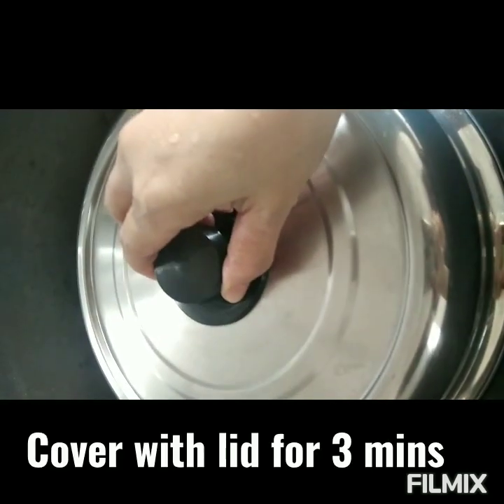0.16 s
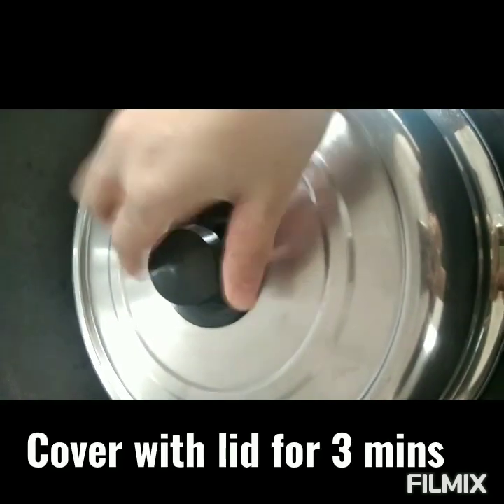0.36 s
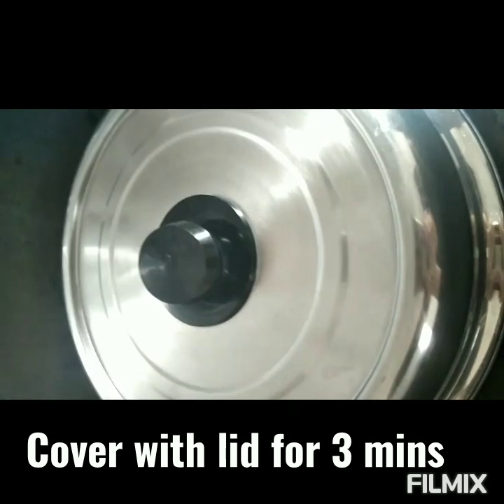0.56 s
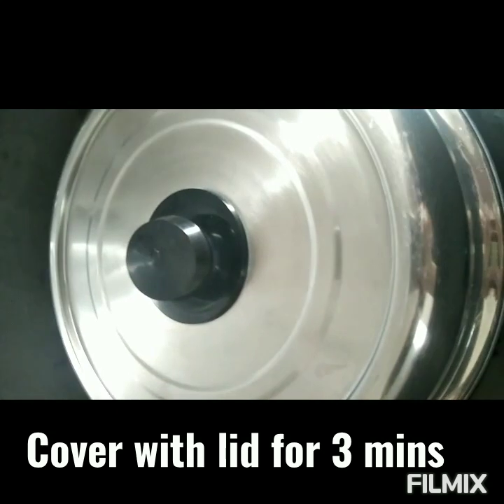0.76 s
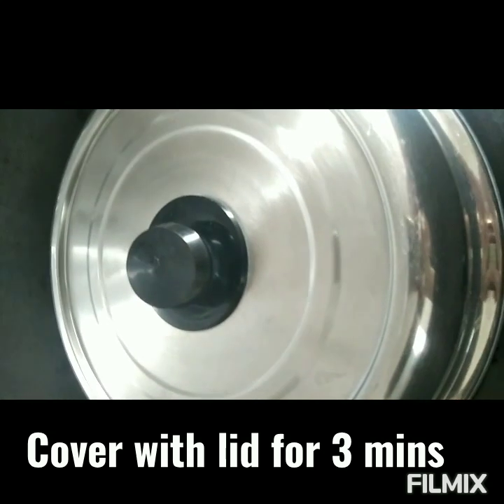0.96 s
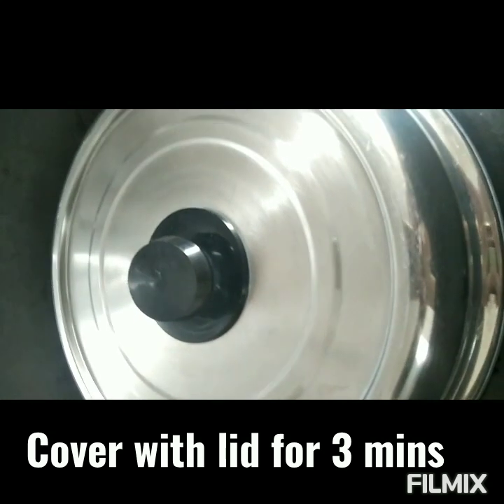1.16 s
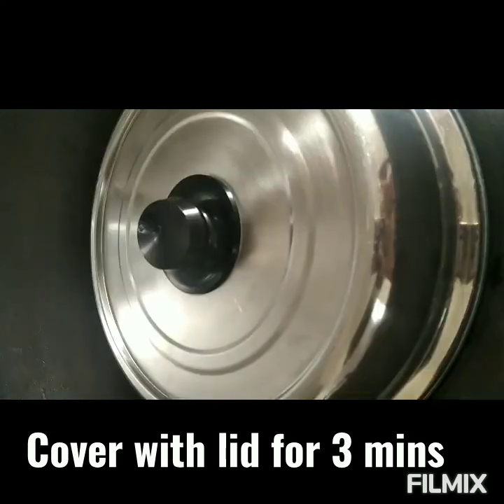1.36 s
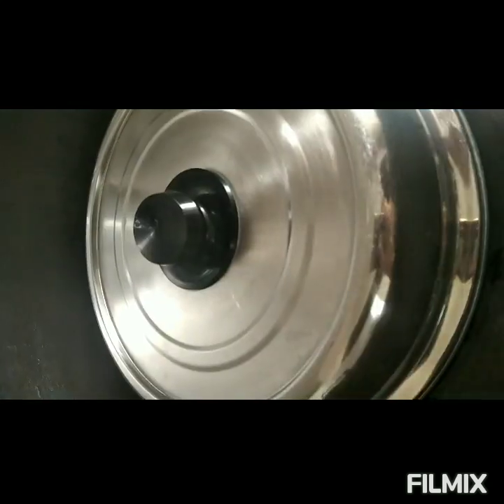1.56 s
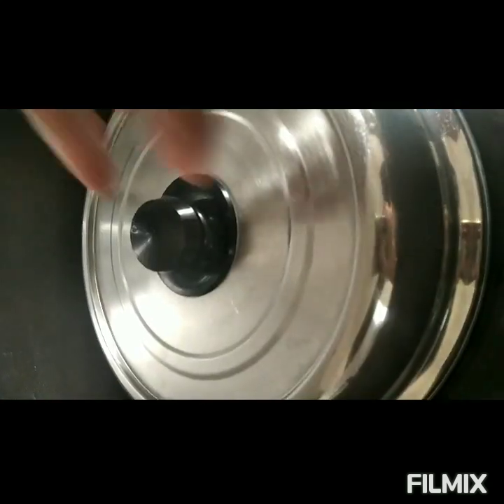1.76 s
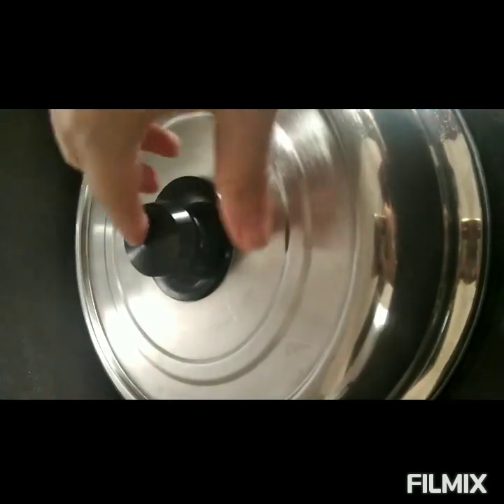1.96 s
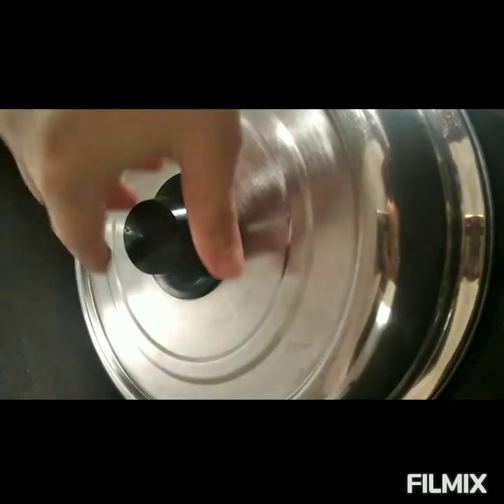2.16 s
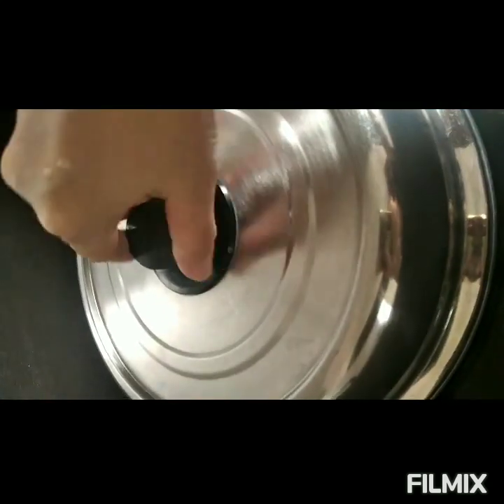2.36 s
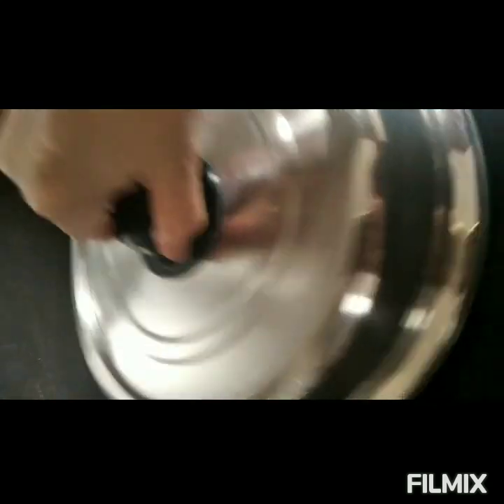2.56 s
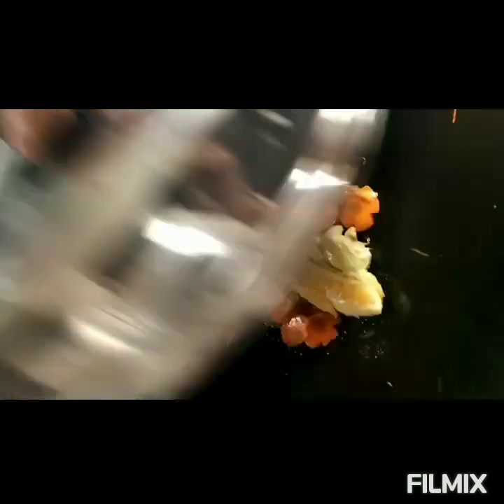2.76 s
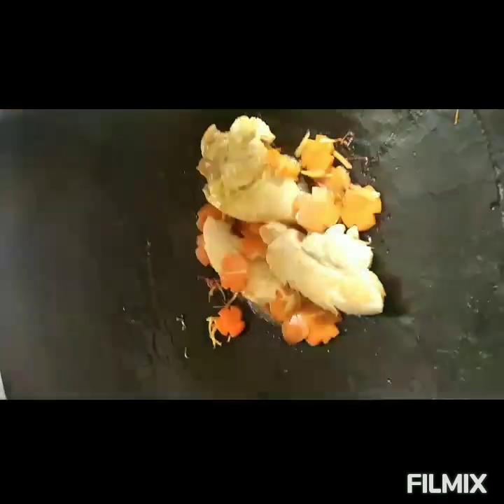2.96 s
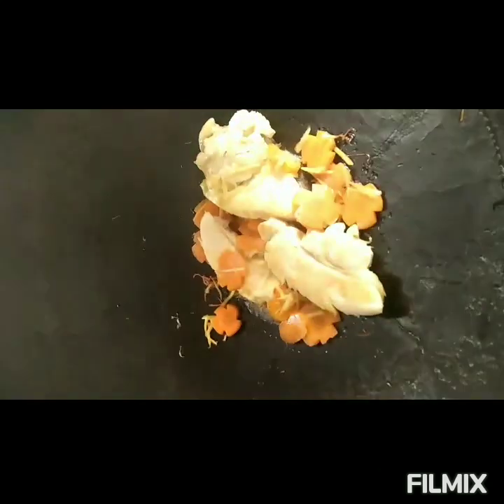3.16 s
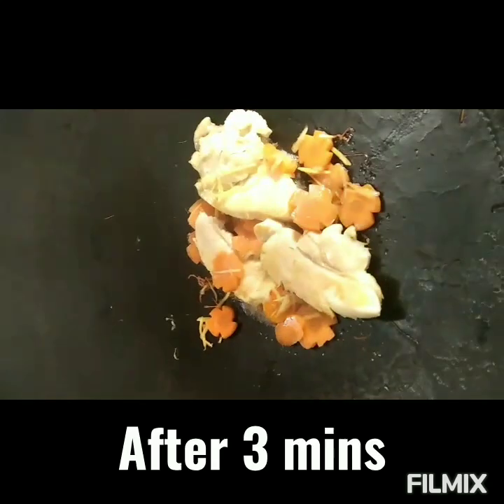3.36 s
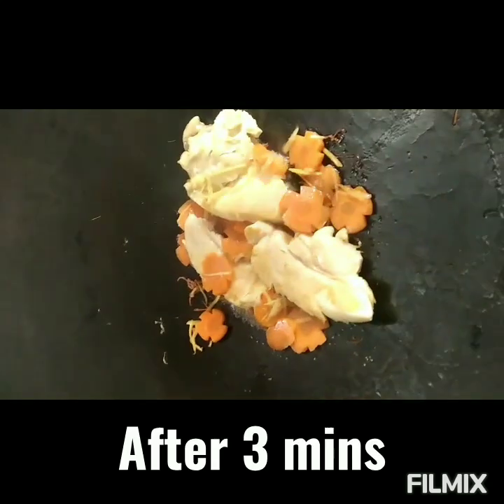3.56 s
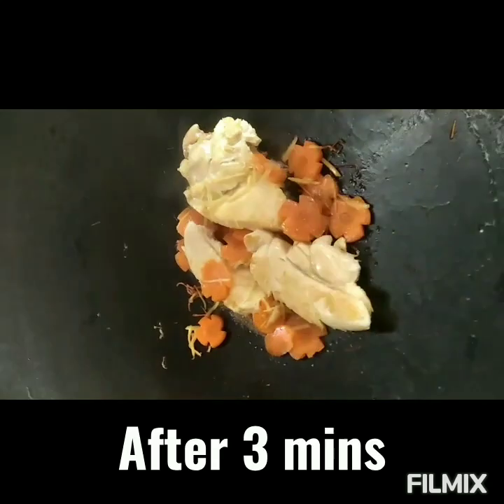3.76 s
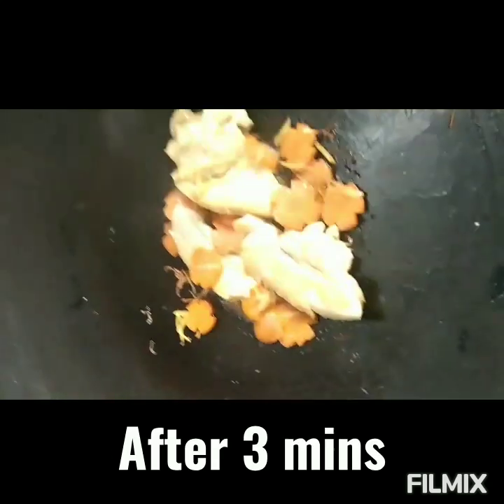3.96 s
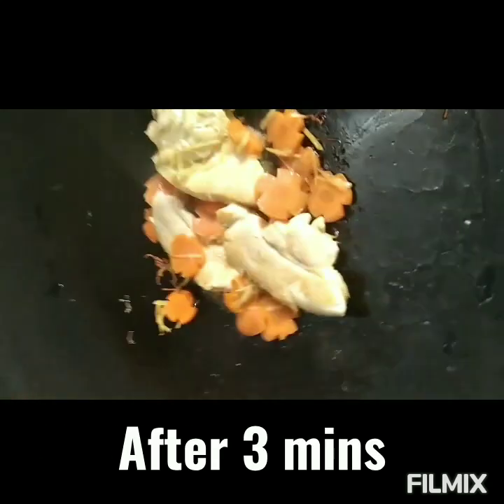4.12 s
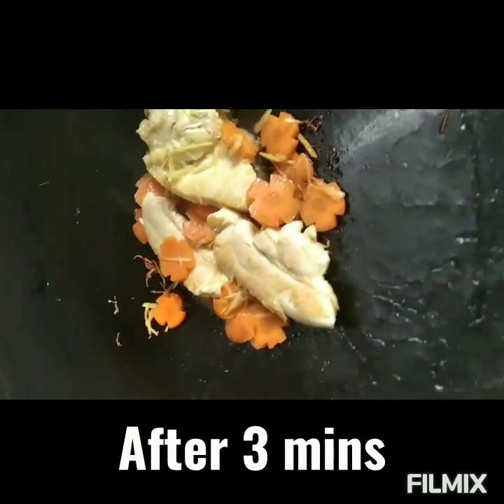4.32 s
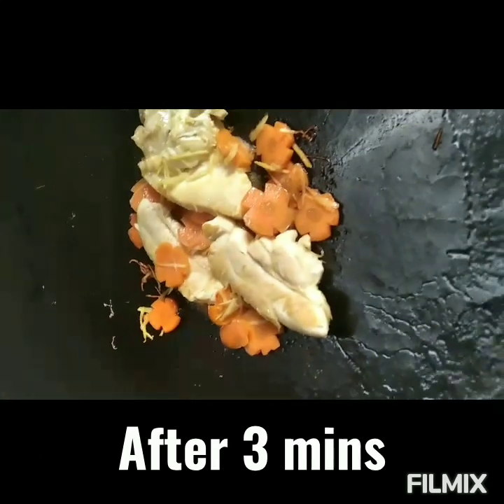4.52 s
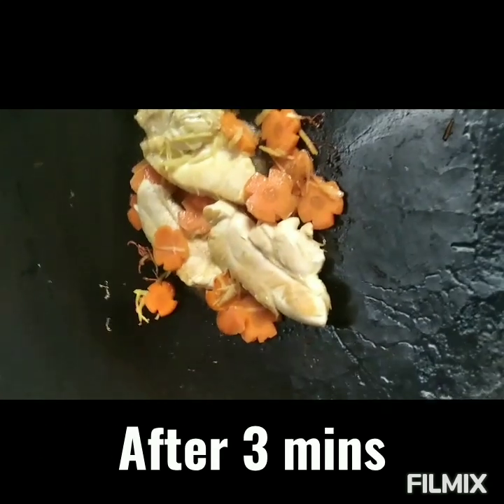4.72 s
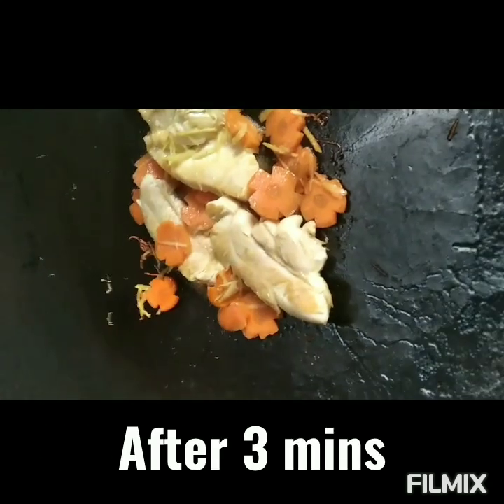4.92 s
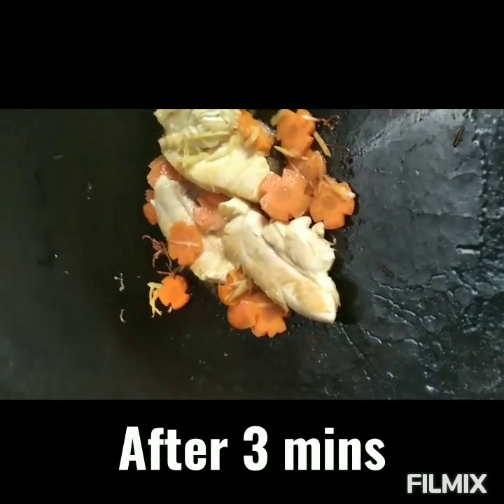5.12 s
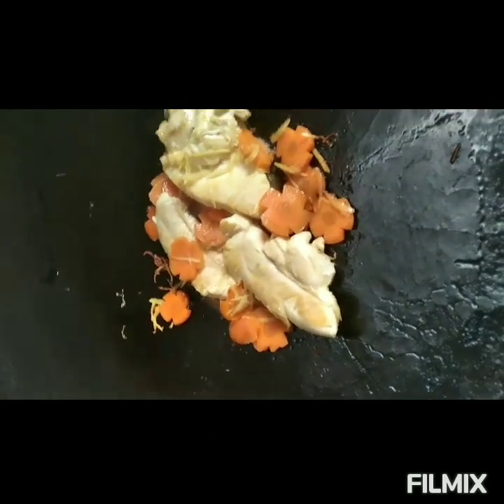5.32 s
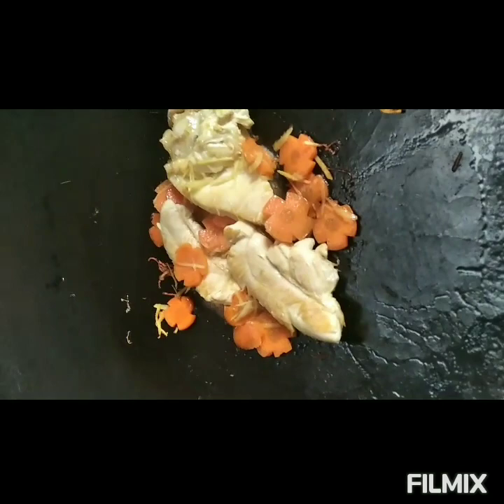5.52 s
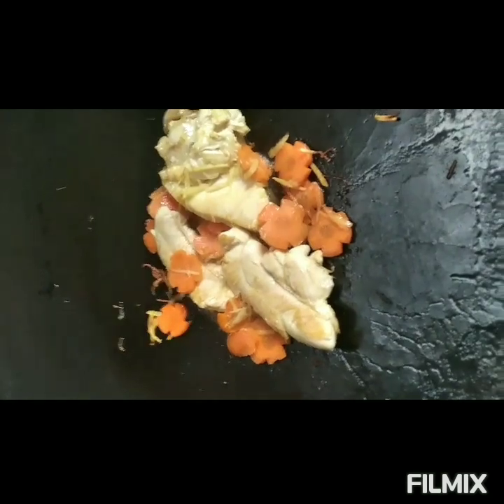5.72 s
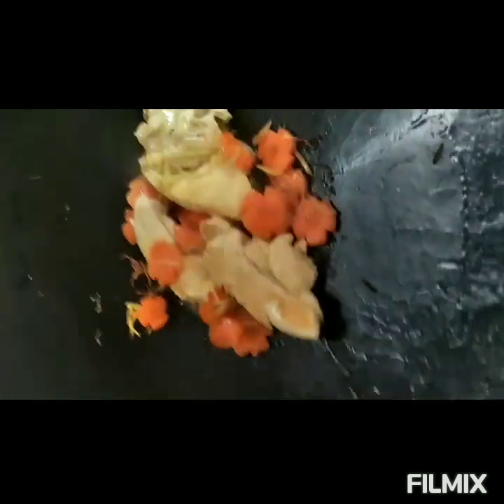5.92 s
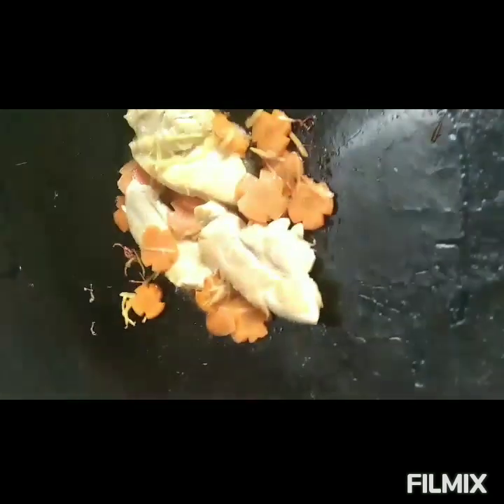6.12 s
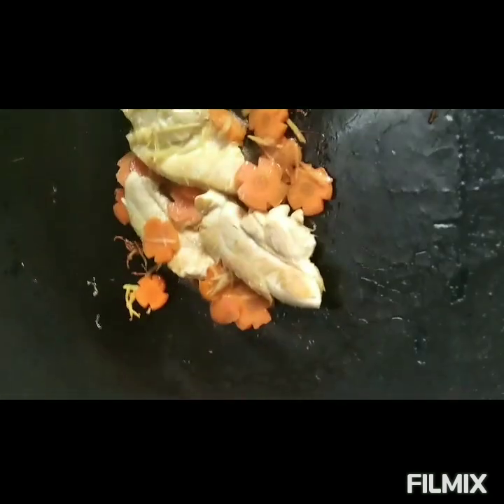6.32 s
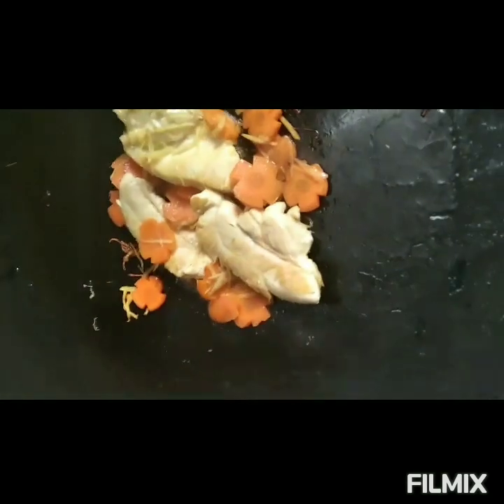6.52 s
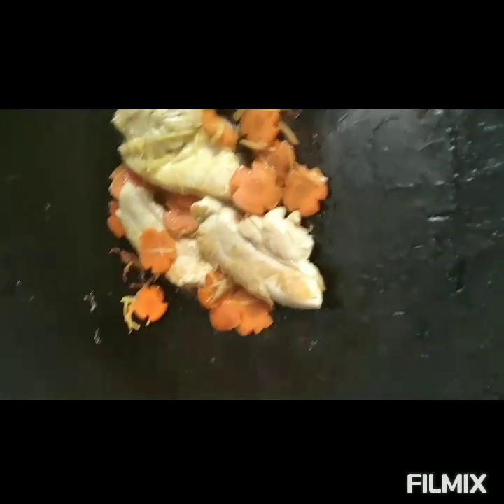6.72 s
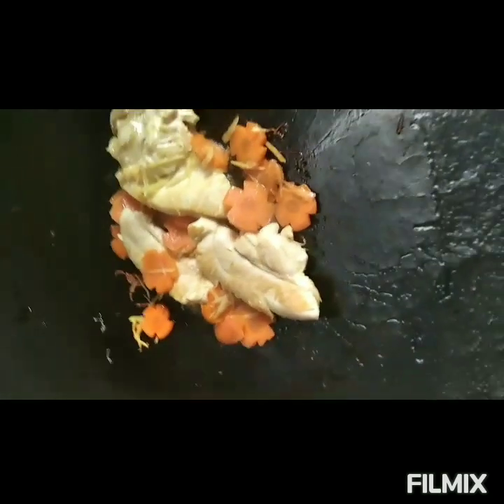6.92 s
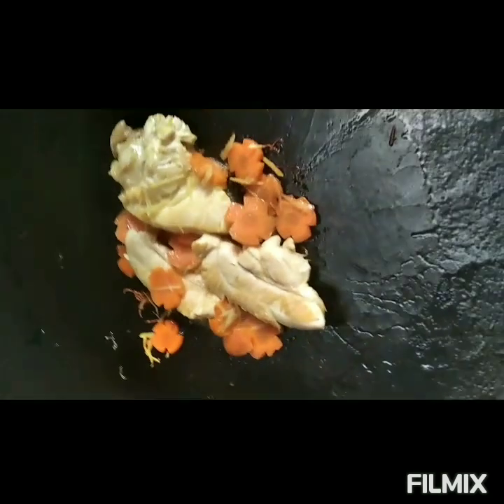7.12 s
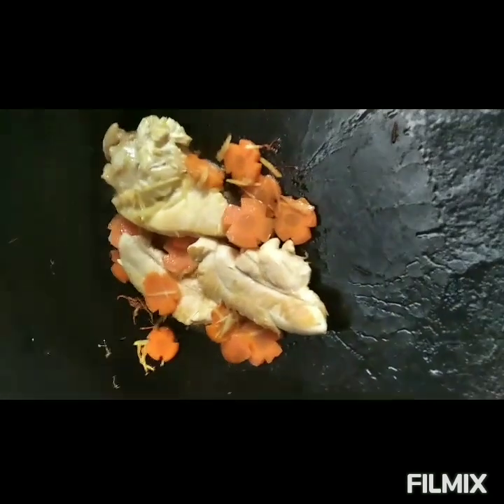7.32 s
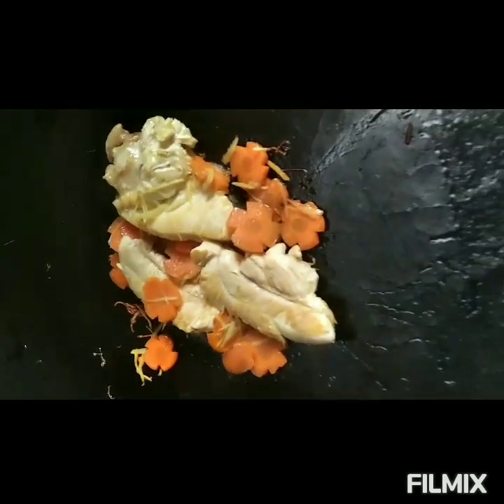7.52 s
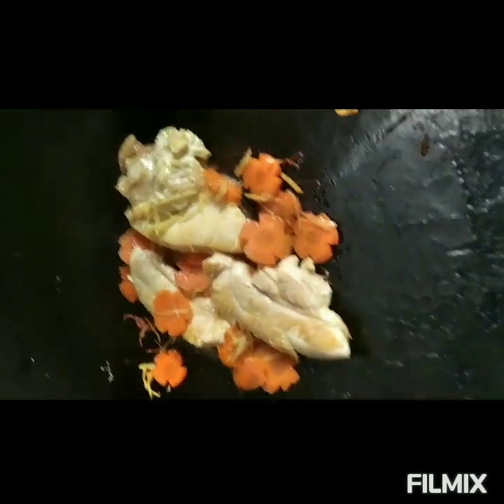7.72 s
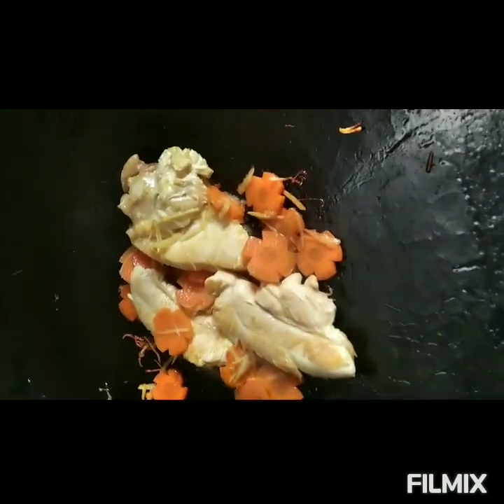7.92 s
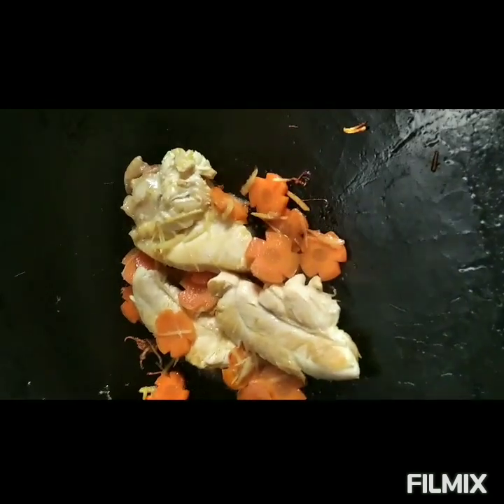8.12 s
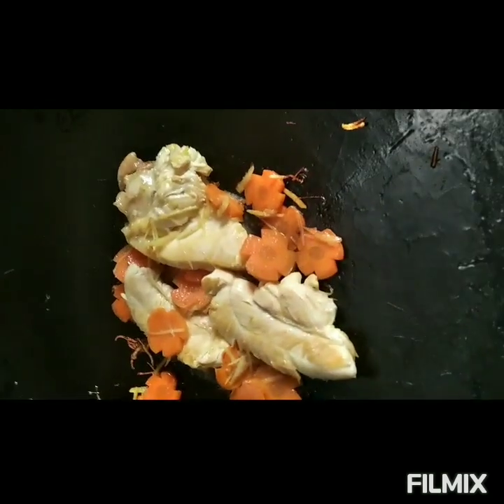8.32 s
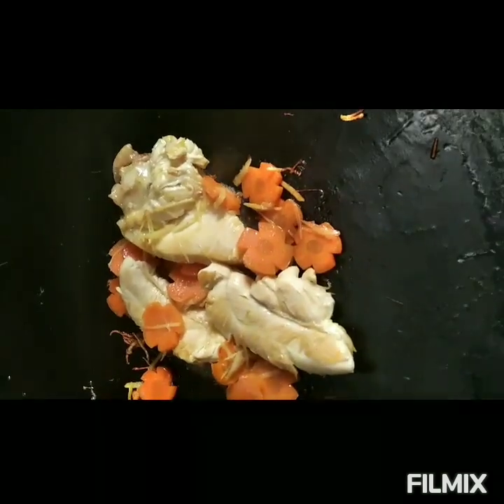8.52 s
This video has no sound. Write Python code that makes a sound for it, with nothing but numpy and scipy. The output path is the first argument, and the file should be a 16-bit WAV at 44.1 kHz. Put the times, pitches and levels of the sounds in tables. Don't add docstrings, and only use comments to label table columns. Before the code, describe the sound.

Close stereo pickup of a wok in a home kitchen: muffled, resonant sizzling under a metal lid, with a dull knock near the start, then a drier, quieter stage. The lid comes off with clicks and spitting steam, and the frying turns open and crisp. After a long even sizzle and tiny creaks, the lid crashes onto the counter, bounces, rings and rolls still. A low fan hum runs underneath.

```python
import sys
import numpy as np
from scipy import signal
from scipy.fft import rfft, irfft, next_fast_len
from scipy.io import wavfile
from scipy.ndimage import uniform_filter1d, map_coordinates

SR = 44100
rng = np.random.default_rng(int(sys.argv[2]) if len(sys.argv) > 2 else 0)


def ratio(d):
    e = np.asarray(d, float) / 20
    return 10 ** e


def put_to_file(sound):
    columns = np.atleast_2d(sound).T
    safe = np.clip(columns, -1, 1)
    whole_steps = np.round(safe * 32767)
    wavfile.write(sys.argv[1], SR, whole_steps.astype(np.int16))


N = 377937
LIFT_S = 2.545

# f/Hz, width/Hz, landing level/dB, rocking level/dB
BODY_MODES = [(270, 18.5, -12.5, -11), (349.5, 18.3, -8.5, -7.5), (382, 11, -3.5, -8), (461, 9, -4.5, 0.5),
              (503.4, 9.7, -2, 2), (576, 12.5, 1, -5), (630, 13, -4, -11), (681, 14, -7, -5.5),
              (770, 23, -20, -7), (886, 19, -13, -10.5)]
# f/Hz, level/dB, t60/s
RIM_MODES = [(2834, -3.5, 0.25), (2894, -1, 0.24), (3240, -10, 1.2), (3420, -34, 5.0), (3590, -8, 0.6),
             (4190, -11, 5.0), (4560, -21, 0.32), (4560, -20, 0.99), (4780, -8.5, 1.0)]


def unit(x):
    return x / np.sqrt(np.mean(x ** 2) + 1e-20)


def along(points, hz):
    f, v = np.transpose(points)
    return np.interp(np.log(hz + 1), np.log(f + 1), v)


def wobble(rate):
    knots = rng.standard_normal(int(N * rate / SR) + 4)
    return map_coordinates(knots, [np.arange(N) * rate / SR])


def filtered(x, response):
    m = next_fast_len(x.shape[-1] + SR // 4)
    spectrum = rfft(x, m) * response(np.fft.rfftfreq(m, 1 / SR))
    return irfft(spectrum, m)[..., :x.shape[-1]]


def band(lo_hz, hi_hz):
    return lambda f: 1 / ((1 + lo_hz / (1j * f + 1e-9)) * (1 + 1j * f / hi_hz)) ** 2


def modes(peaks):
    def response(f):
        total = 0
        for k, (centre, width, db) in enumerate(peaks):
            damping = 1j * f * width
            total = total + (-1) ** k * ratio(db) * damping / (centre * centre - f * f + damping)
        return total
    return response


def ring(table, t, stretch):
    tones = 0
    for hz, db, t60 in table:
        decay_db = -60 * t / (stretch * min(t60, .45))
        tones = tones + ratio(db + rng.normal(0, 3.6) + decay_db) * np.sin(2 * np.pi * hz * t)
    return tones * (1 - np.exp(-t / 0.0016))


def swell(s, rise, t60, stop=np.inf):
    t = np.arange(N) / SR - s
    let_go_s = 0.033
    release = np.clip((stop - s - t) / let_go_s + 1, 0, 1)
    return np.clip(t / rise, 0, 1) * ratio(-60 * np.clip(t - rise, 0, None) / t60) * release


def heat():
    t = np.arange(N) / SR
    later_s, opening_s = 1.333, 0.059
    # t/s, rise/s, level/dB, t60/s
    gusts = [
        (2.56, 0.079, -35, 0.34),
        (2.84, 0.03, -39, 0.39),
    ]
    opened = np.clip((t - LIFT_S) / opening_s, 0, 1)
    early = ratio(-42 + 6 * np.exp(-t / 0.09)) * (t < later_s)
    late = ratio(-47.5) * (t >= later_s) * (1 - opened)
    bare = ratio(-36 + 4.5 * np.exp(-abs(t - LIFT_S) / 0.38)) * opened
    steam = sum(ratio(db) * swell(s, rise, t60) for s, rise, db, t60 in gusts)
    return early, late, bare, steam


def crackle():
    pops_per_s, pop_t60 = 900, 0.0051
    pops = (rng.random((2, N)) < pops_per_s / SR) * ratio(2.1 * rng.exponential(size=(2, N)))
    decay = ratio(-60 * np.arange(400) / SR / pop_t60)
    puff = signal.fftconvolve(pops, decay[None], axes=1)[:, :N]
    hiss = rng.standard_normal((2, N)) * (1 + 0.19 * unit(puff))
    z = signal.stft(hiss, nperseg=512)[2]
    field = rng.standard_normal(z.shape[1:])
    field = uniform_filter1d(uniform_filter1d(field, 8, 0), 10, 1)
    uneven = signal.istft(z * ratio(1.06 * unit(field)), nperseg=512)[1][:, :N]
    return uneven * ratio(0.45 * wobble(7))


def sizzle():
    # f/Hz, level/dB per Hz
    covered = [(350, -33), (600, -12.5), (783, -23), (931, -0.5), (1300, -17.5), (1570, -8.5),
               (1790, -13.5), (2190, -4.5), (3930, -3), (4990, -8), (8740, 0.5), (13000, -14.5),
               (14500, -21)]
    covered_late = [(350, -28), (600, -23), (659, -8.5), (804, -22.5), (1170, -3.5), (1650, -15),
                    (1960, -3.5), (2670, -6.5), (4200, -2.5), (5200, -11), (8860, -5), (12900, -20),
                    (14500, -20)]
    uncovered = [(240, -50), (400, -18), (479, -27.5), (564, -7.5), (617, -14), (1010, -10), (1090, -12),
                 (2200, -5.5), (3240, 0), (4570, -1), (5000, -8.5), (9100, -2), (13600, -17), (14200, -20)]
    # f/Hz, width/Hz, level/dB
    dome = [(952, 96, -7), (1574, 41, 3), (2170, 51, -1.5), (2690, 32, -2.5), (3280, 50, 0),
            (3690, 39, -0.5), (3940, 130, -4), (4440, 51, 2.5)]
    dome_late = [(1155, 57, -5), (2000, 50, -6), (2630, 170, 0), (3400, 71, -4), (4320, 100, -6)]
    # f/Hz, left minus right level/dB
    lean = [(60, 12), (110, 9), (200, 41.5), (370, 3), (690, -5.5), (1270, -5), (2330, 6), (4290, 4.5),
            (7900, -1.5), (14600, 7.5)]
    # t/s, peak level/dB, t60/s
    spits = [(2.6244, -26.5, 0.026), (2.6394, -30, 0.018), (2.7294, -27, 0.029), (2.793, -15.5, 0.057),
             (2.854, -21.5, 0.085), (2.8894, -18, 0.034), (2.992, -16.5, 0.066), (3.0294, -25, 0.033),
             (3.1044, -31, 0.026), (3.161, -24, 0.028), (3.2894, -19, 0.041)]

    early, late, bare, drips = heat()
    t = np.arange(SR // 5) / SR
    for s, db, t60 in spits:
        drips[round(s * SR):][:len(t)] += ratio(db - 11 - 60 * t / t60) * (1 - np.exp(-t / 0.0028))

    def tilt(f):
        return ratio(along(lean, f) / 2 * np.array([[1], [-1]]))

    def shut(base, air, leak):
        air_response = modes(air)
        return lambda f: tilt(f) * ratio(along(base, f)) * np.sqrt(leak + np.abs(air_response(f)) ** 2 * 4)

    frying = crackle()
    out = ratio(7.0) * early * unit(filtered(frying, shut(covered, dome, leak=0.48)))
    out += ratio(8.0) * late * unit(filtered(frying, shut(covered_late, dome_late, leak=0.4)))
    pan = unit(filtered(frying, lambda f: tilt(f) * ratio(along(uncovered, f))))
    bright = unit(np.diff(pan, prepend=0))
    return out + ratio(6) * bare * pan + ratio(4.0) * drips * (0.42 * pan + bright)


def blows():
    # t/s, peak level/dB, body level/dB, edge level/dB
    impacts = [
        (7.171, -10, -7, -5),
        (7.171, -4, -1, -7),
        (7.194, -6, 2, -7),
        (7.209, -9.5, -12, -2),
        (7.271, 5, -14, -23.5),
        (7.294, -8, -2, -18),
        (7.332, -3, -8, -33),
        (7.384, -12, -14, -26),
        (7.729, -7, -10, -24),
    ]
    # f/Hz, level/dB, t60/s
    edge_modes = [(4180, -11.5, 1.1), (4560, -4, 2.9), (4860, -18, 5.0), (5145, -1, 0.99),
                  (5320, -12, 0.64), (5600, -26, 5.0), (5760, -31, 0.098), (5886, -8.5, 0.28),
                  (6480, -9, 0.87), (7400, 2, 0.15), (8270, -0.5, 0.23), (9378, -1, 0.37),
                  (9700, -0.5, 0.12), (10200, -22, 0.11)]
    out, t = np.zeros(N + SR), np.arange(SR // 3) / SR
    low = [(hz, db, .1) for hz, width, db, rocking_db in BODY_MODES]
    for s, db, body_db, edge_db in impacts:
        swarm = [(2300 * 4.6 ** u, -7 - 6 * v, .3) for u, v in rng.random((30, 2))]
        crack = ratio(-60 * t / 0.062) * filtered(rng.standard_normal(len(t)), band(1800, 16500))
        bright = ring(edge_modes, t, 0.96) + 0.97 * ring(swarm, t, 0.76) + 3.0 * crack
        blow = ratio(body_db - 4) * ring(low, t, 0.83)
        blow += ratio(edge_db - 2.5) * bright
        blow += ratio(-10) * ring(RIM_MODES, t, 0.27)
        out[round(s * SR):][:len(t)] += ratio(db - 11.5) * blow
    return out[:N]


def rocking():
    # t/s, length/s, counter level/dB, chatter level/dB, rim level/dB
    landings = [
        (7.167, 0.13, -34, -21.5, -22),
        (7.265, 0.22, -28.5, -22, -20),
    ]
    # t/s, length/s, counter level/dB, chatter level/dB
    rocks = [
        (7.498, .105, -37, -37.5),
        (7.614, 0.12, -34, -37.5),
        (7.715, 0.14, -29, -39),
        (7.897, 0.089, -48, -56.5),
    ]
    # t/s, rise/s, level/dB, t60/s, f/Hz
    bell_modes = [
        (7.168, .012, -37.5, 0.98, 2022),
        (7.262, 0.0088, -37, 0.25, 2022),
        (7.262, 0.011, -33, 0.57, 2308),
        (7.28, 0.075, -41, 1.83, 1444),
        (7.42, 0.13, -42.5, .5, 461),
        (7.94, .08, -41, .25, 509),
        (7.31, 0.028, -34, .3, 384),
        (7.168, .01, -30, .35, 576),
        (7.27, .01, -31.5, .25, 560),
    ]
    first, t = round(7.1 * SR), np.arange(N) / SR
    jolts = ratio(4.2 * wobble(60))[first:]

    def fed(response):
        noise = rng.standard_normal(N - first) * jolts
        return np.pad(unit(filtered(noise, response)), (first, 0))

    contact = 0.71
    hard = sum(ratio(db) * swell(s, 0.0086, 0.75, s + contact * length) for s, length, _, db, _ in landings)
    rim = sum(ratio(db) * swell(s, 0.0062, 0.33, s + contact * length) for s, length, *_, db in landings)
    lead_in_s = .01
    rim += ratio(-36) * swell(landings[0][0] - lead_in_s, lead_in_s, .05)
    soft = sum(ratio(db) * swell(s - .015, 0.043, 1.5, s + 0.9 * length) for s, length, _, db in rocks)

    landing_body = modes([row[:3] for row in BODY_MODES])
    rocking_body = modes([(hz, width, db) for hz, width, _, db in BODY_MODES])
    scrape = modes([(864, 530, -3.0), (1300, 130, -0.5), (1700, 240, -3)])
    out = ratio(-4.5) * hard * fed(lambda f: landing_body(f) * band(250, 750)(f))
    out += soft * fed(rocking_body)
    out += ratio(-2.5) * rim * fed(modes([(hz, 40, db) for hz, db, t60 in RIM_MODES]))
    out += ratio(-7) * rim * fed(band(1450, 5500))
    out += ratio(-12) * (hard + 3.2 * soft) * fed(scrape)

    drift = 0.47 * wobble(25)
    bell = 0
    for s, rise, db, t60, hz in bell_modes:
        bell = bell + ratio(db) * swell(s, rise, t60) * np.sin(2 * np.pi * hz * t + drift)
    counter = ratio(-46.5) * swell(landings[0][0], .05, 5.6)
    for s, length, db, *_ in landings + rocks:
        counter = counter + ratio(db) * abs(np.sin(np.pi * np.clip((t - s) / length, 0, 1)))
    boom_tone = ratio(1.6 * wobble(30)) * np.sin(2 * np.pi * 123 * t + 0.77 * wobble(20))
    boom = counter * (boom_tone + 0.13 * fed(band(95, 140)))
    return out, ratio(8) * bell + ratio(5.5) * boom


def knocks():
    # t/s, level/dB, click level/dB, ring share
    contacts = [
        (0.125, -23.5, -13, 0.73),
        (2.547, -25, -24, 1),
        (2.564, -30, -3, 1.5),
        (8.53, -40.5, -3, 1.8),
    ]
    # f/Hz, level/dB, t60/s
    lid_modes = [(250, 1.5, 0.69), (360, 1.5, 0.47), (435, 3, 0.081), (458.5, 5, 1.2), (553.6, 6, 0.61),
                 (830, -37.5, 0.59), (824, -28.5, 0.13)]
    # t/s, peak level/dB, f/Hz
    creaks = [
        (5.3, -42, 562),
        (5.495, -43, 352),
        (6.295, -37, 558),
        (6.675, -36.5, 585),
    ]
    # t/s, peak level/dB, centre f/Hz
    dry_taps = [
        (2.822, -19.5, 1040),
        (2.854, -31, 2200),
        (8.531, -30, 1700),
    ]
    # t/s, level/dB, t60/s
    shifts = [
        (0, -44, 0.4),
        (.126, -33, 0.27),
        (.27, -49.5, 0.55),
        (.44, -49.5, .45),
        (2.547, -30.5, 0.63),
        (2.818, -41, 0.15),
        (2.89, -47, 0.57),
    ]
    out, taps, t = np.zeros(N + SR), np.zeros(N), np.arange(SR // 3) / SR
    thump = ratio(19 - 60 * t / .028) * np.sin(2 * np.pi * 480 * t) * (1 - np.exp(-t / .0015))
    for s, db, click_db, share in contacts:
        click = ratio(click_db - 12 - 60 * t / .012) * np.diff(rng.standard_normal(len(t) + 1))
        knock = ring(lid_modes, t, 0.31 * share) + click + thump
        out[round(s * SR):][:len(t)] += ratio(db - 13.5) * knock
    for s, db, hz in creaks:
        creak = ratio(db - 60 * t / 0.16) * np.sin(2 * np.pi * hz * t) * (1 - np.exp(-t / 0.0031))
        out[round(s * SR):][:len(t)] += creak
    for s, db, hz in dry_taps:
        tap = .6 * np.sin(2 * np.pi * hz * t) + 1.04 * np.sin(2 * np.pi * 3.5 * hz * t)
        tap += .4 * rng.standard_normal(len(t))
        taps[round(s * SR):][:900] += (ratio(db + 15.0 - 60 * t / 0.0021) * tap)[:900]
    wide = modes([(hz, 45, .5 * db) for hz, db, t60 in lid_modes[:5]])
    rubbing = filtered(rng.standard_normal(N), lambda f: wide(f) * band(120, 900)(f))
    strength = sum(ratio(db) * swell(s, 0.0032, t60) for s, db, t60 in shifts)
    rumble = ratio(-2.0) * strength * unit(rubbing)
    return out[:N] + rumble + filtered(taps, band(370, 8400))


def hood():
    # f/Hz, level/dB per Hz
    rush_spectrum = [(15, -60), (25, -38), (54, -5.5), (119, -2), (151, -7), (263, -5), (315, -9.5),
                     (350, -4.5), (591, -10.5), (637, -10.5), (900, -29), (1170, -63), (1980, -120)]
    # t/s, level/dB
    surges = [
        (1.09, -53),
        (3.039, -50),
        (4.69, -59.5),
        (5.28, -70),
        (5.53, -63),
        (6.84, -71),
        (8.0, -63),
        (8.56, -42),
    ]
    t = np.arange(N) / SR
    one, other = filtered(rng.standard_normal((2, N)), lambda f: ratio(along(rush_spectrum, f)))
    rush = ratio(-57.5 + 3.5) * unit(np.array([one, 0.59 * one + 0.69 * other]))
    hum = ratio(np.where(t < LIFT_S, -60.5, -67) + 1.5 * wobble(9))
    surge_s = .06
    hum = hum + sum(ratio(db) * np.exp(-((t - s) / surge_s) ** 2) for s, db in surges)
    return rush + hum * ratio(5.5) * np.sin(2 * np.pi * 122 * t + 2.3 * wobble(14))


def kitchen(x):
    # f/Hz, t60/s
    decay = [(200, 0.3), (2000, 0.52), (10000, 0.13)]
    hz, t, z = signal.stft(rng.standard_normal((2, SR // 2)), SR, nperseg=256)
    tail = signal.istft(z * ratio(-60 * t / along(decay, hz)[:, None]), SR, nperseg=256)[1]
    delayed = np.pad(x, (150, 0))[None]
    return signal.fftconvolve(delayed, tail / np.linalg.norm(tail[0]), axes=1)[:, :N]


def scene():
    steel, tones = rocking()
    lid = steel + blows() + knocks()
    direct = np.array([ratio(4.0) * np.roll(lid, 8), ratio(-4.0) * lid])
    return direct + ratio(-3) * kitchen(lid) + tones + sizzle() + hood()


def low_pass(x):
    return signal.sosfilt(signal.butter(12, 15150, fs=SR, output="sos"), x)


def record(dry):
    def ports(f):
        return abs(np.array([band(55, 1e6)(f), band(225, 1e6)(f)])) * (f < 14450)

    dry = dry / (1 + abs(dry / .85) ** 4) ** .25
    mix = filtered(dry, ports)
    return low_pass(mix)


dry = scene()
out = record(dry)
put_to_file(out)
```